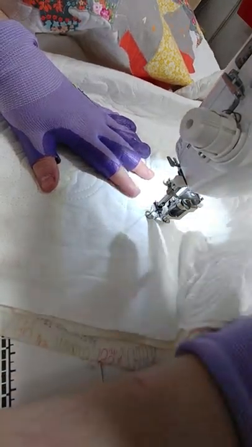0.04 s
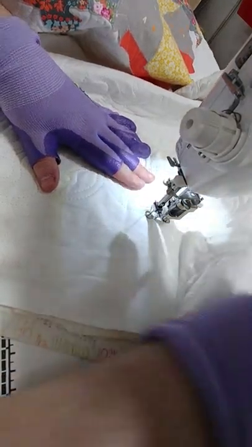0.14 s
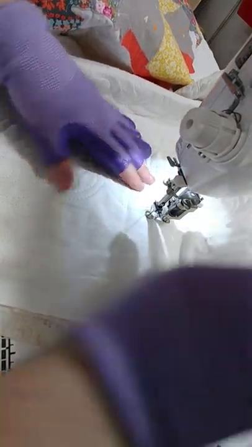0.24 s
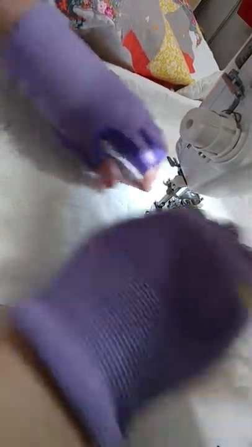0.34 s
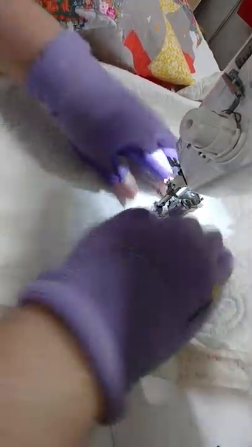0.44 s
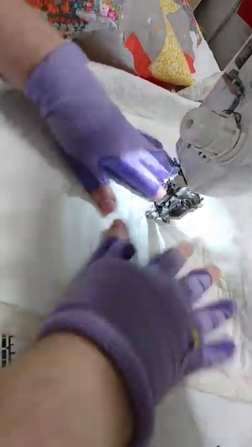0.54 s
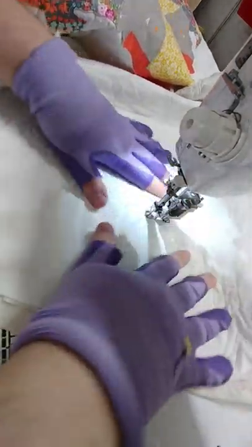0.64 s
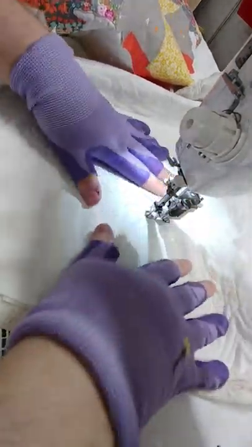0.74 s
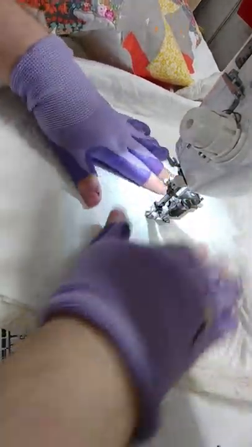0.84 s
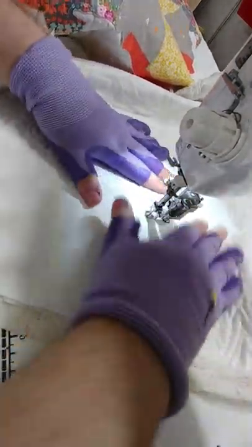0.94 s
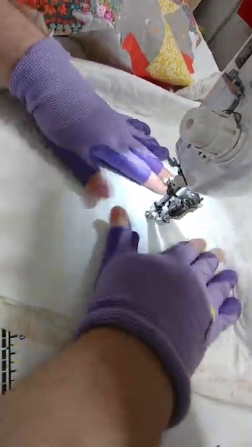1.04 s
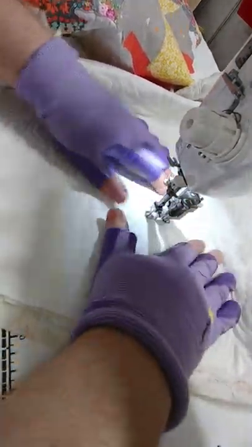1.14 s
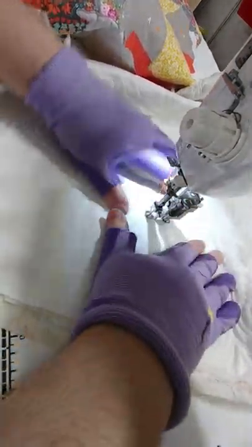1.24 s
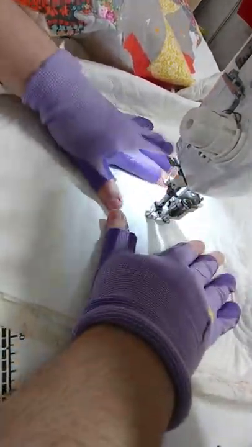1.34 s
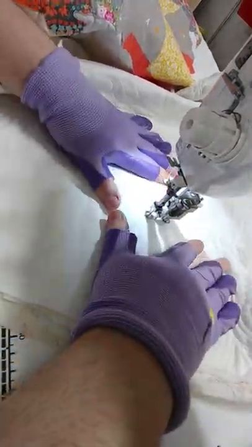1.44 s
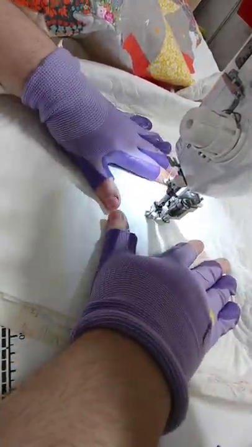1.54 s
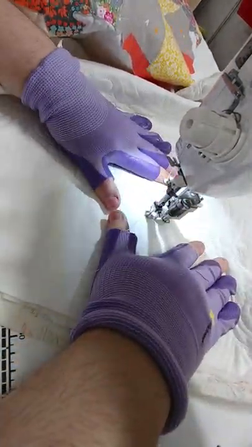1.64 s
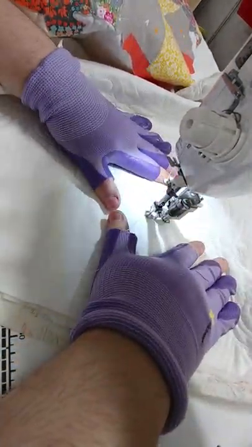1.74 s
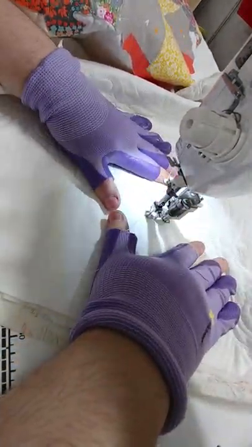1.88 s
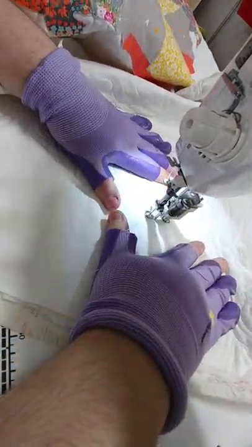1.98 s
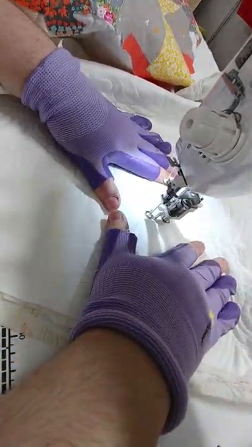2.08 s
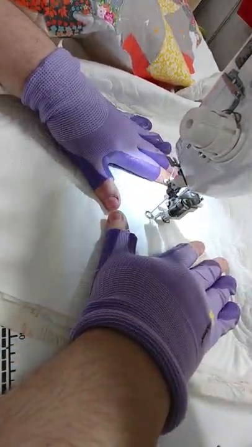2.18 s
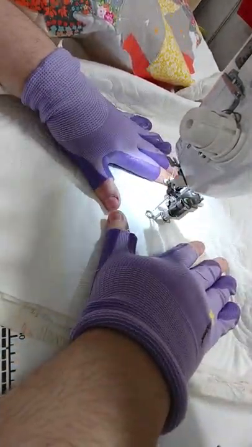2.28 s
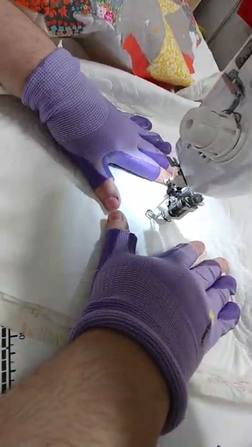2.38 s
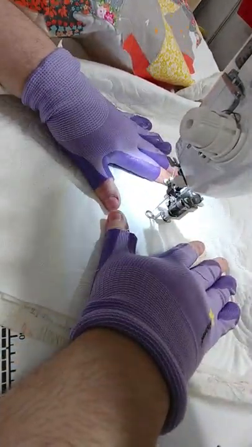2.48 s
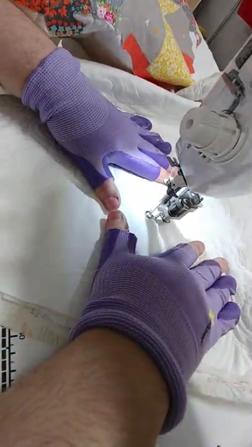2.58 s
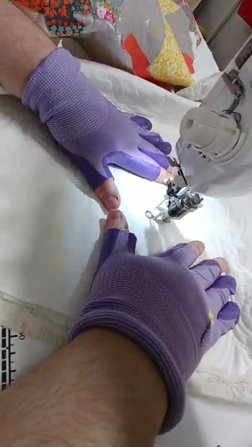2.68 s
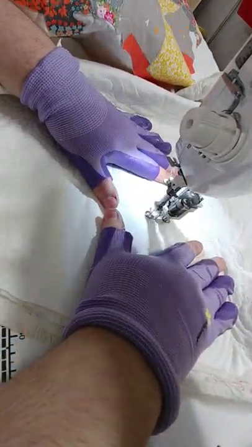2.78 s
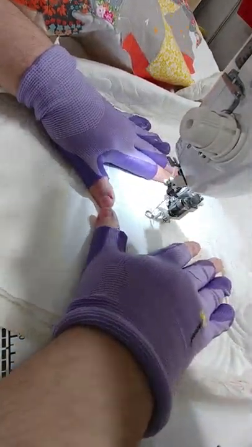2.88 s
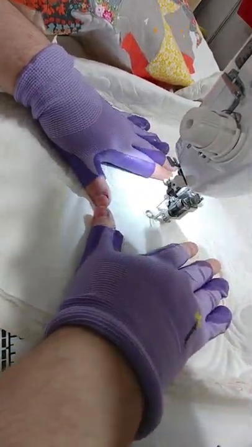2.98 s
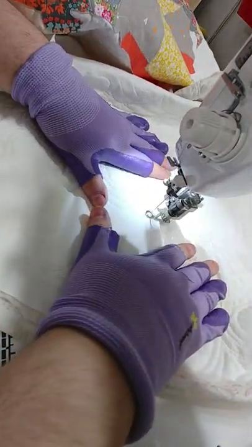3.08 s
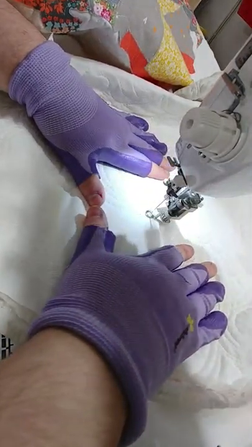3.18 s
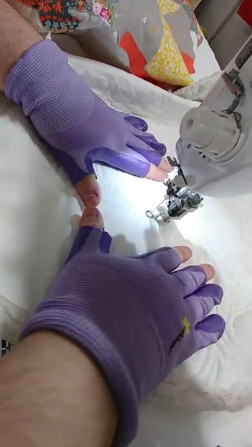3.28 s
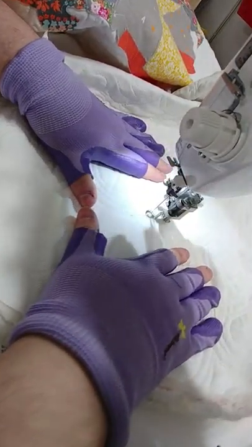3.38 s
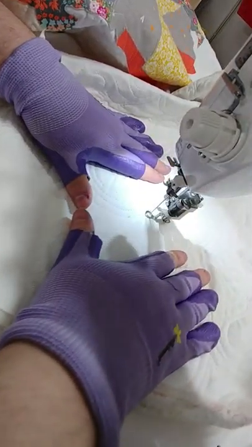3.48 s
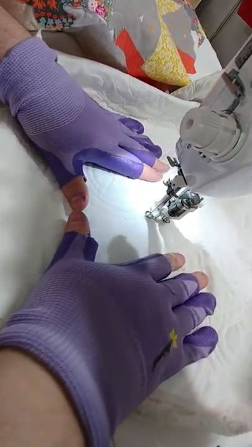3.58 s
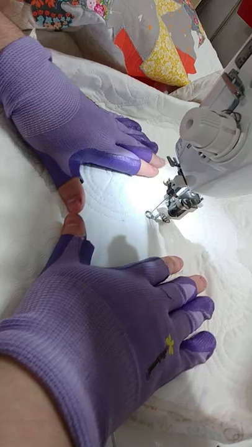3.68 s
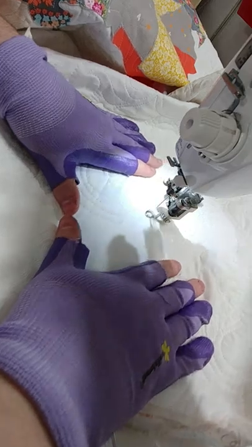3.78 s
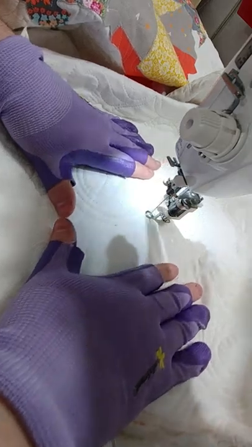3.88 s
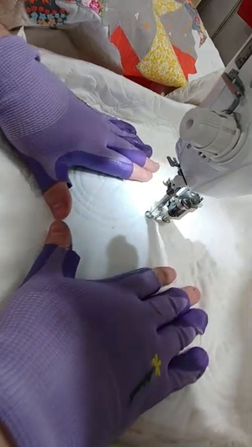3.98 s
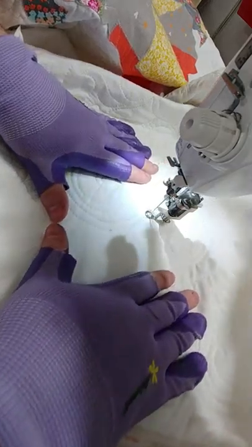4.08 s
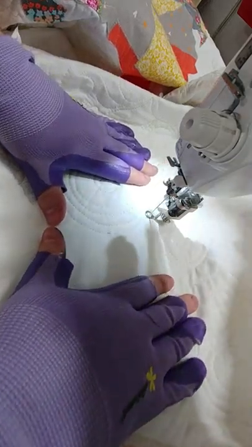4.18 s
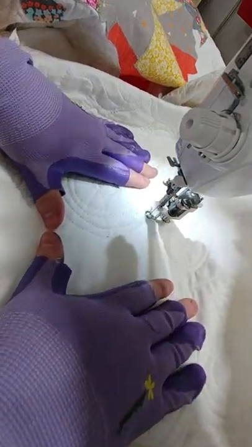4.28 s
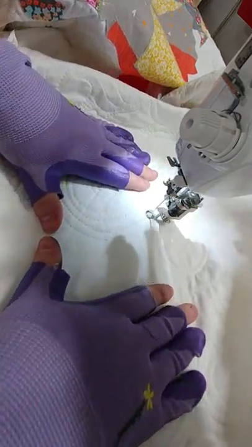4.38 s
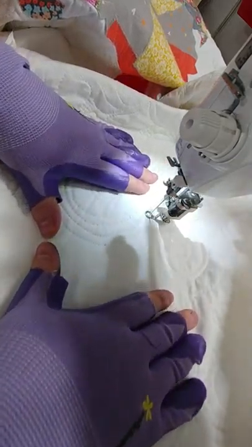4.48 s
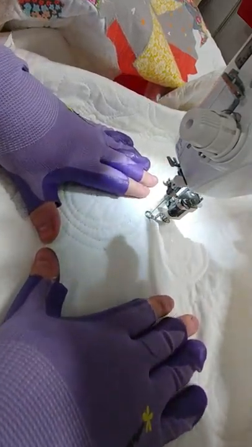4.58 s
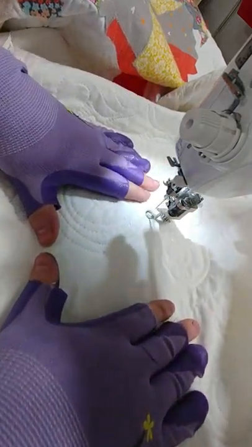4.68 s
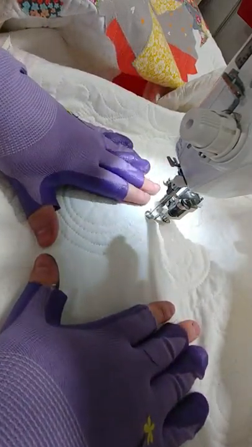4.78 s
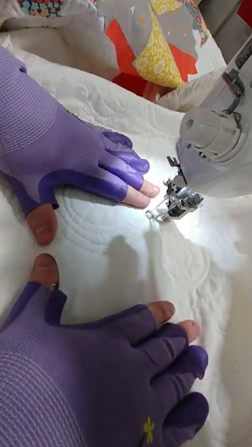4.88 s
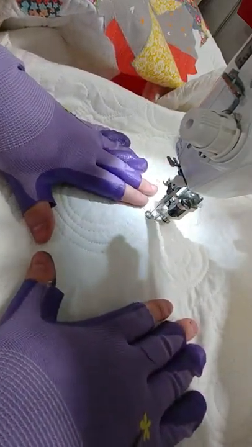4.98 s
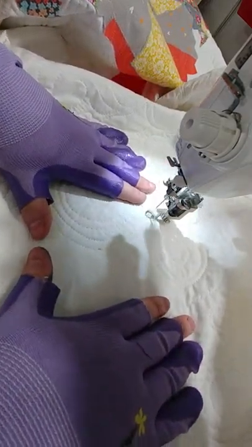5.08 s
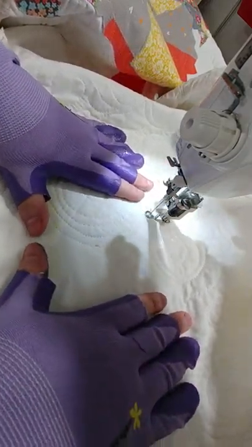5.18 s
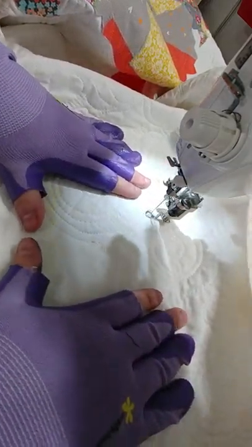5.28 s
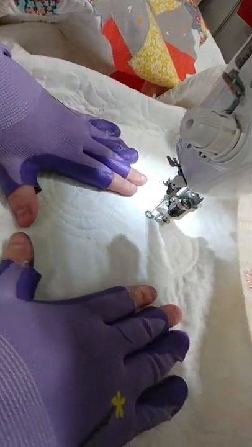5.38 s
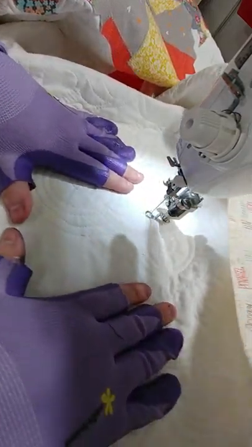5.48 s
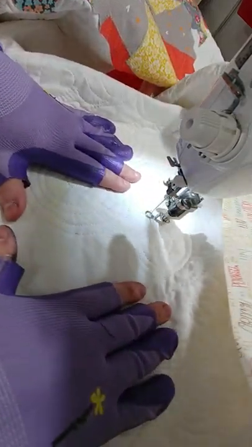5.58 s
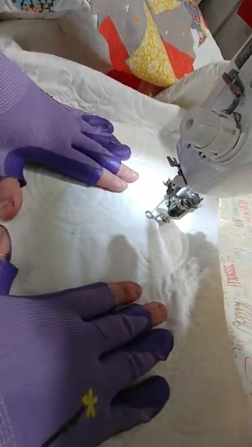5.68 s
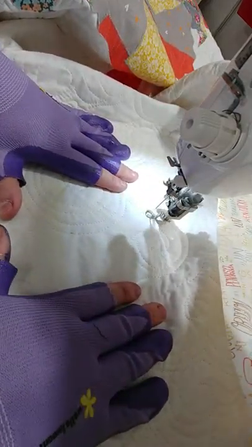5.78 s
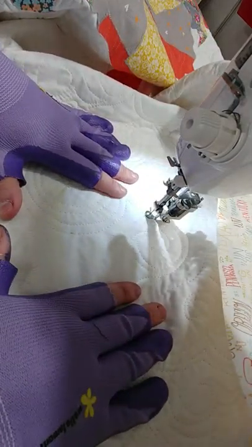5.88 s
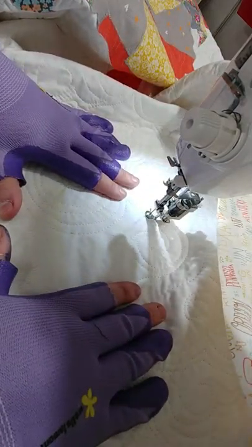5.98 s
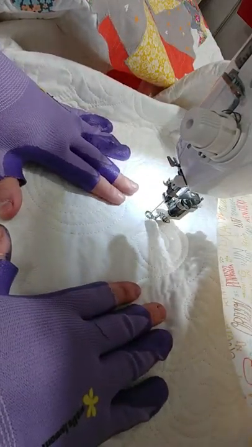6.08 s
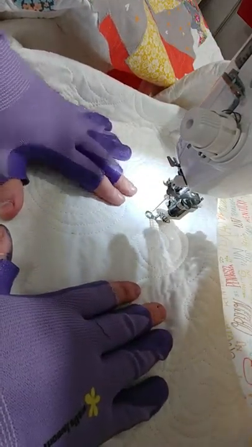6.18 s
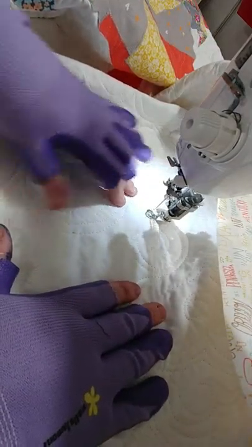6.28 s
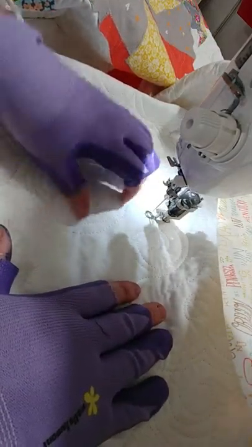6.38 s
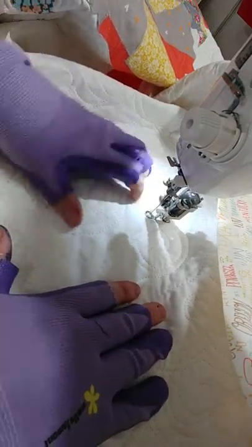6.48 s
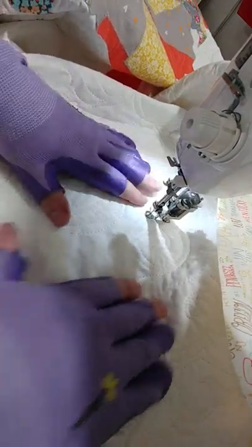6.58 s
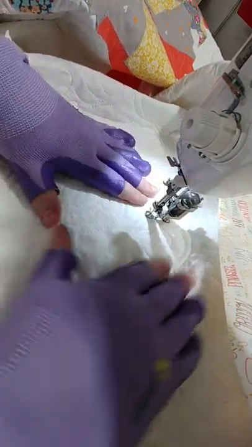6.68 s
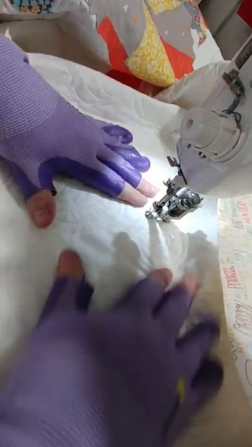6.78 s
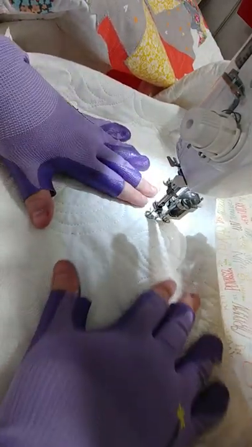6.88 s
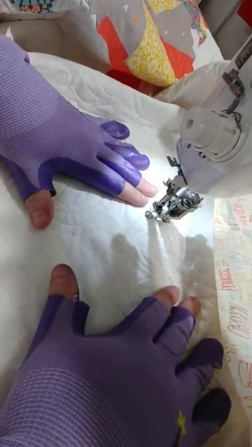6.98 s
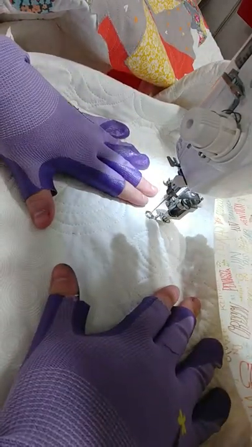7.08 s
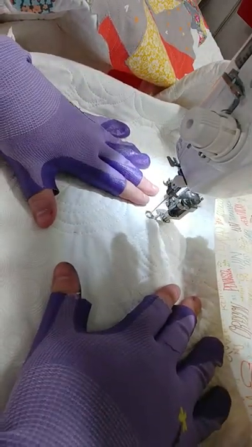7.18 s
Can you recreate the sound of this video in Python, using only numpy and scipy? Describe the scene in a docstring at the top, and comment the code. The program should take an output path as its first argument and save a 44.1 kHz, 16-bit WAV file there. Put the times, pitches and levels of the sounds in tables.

```python
"""At a sewing table, close by: a household machine's pedal makes the motor buzz, then the shaft speeds up.
Every stitch clicks in the needle mechanism and thumps the body and table: bursts of noise and ringing modes.
Hum and whine are stacked tones; buzz and gear whir are coloured noise that follows the pedal and the shaft.
Gloved hands push a quilt: table rumble and grainy cloth rustle, over a faint hiss and a short, bright room answer."""
import sys
import numpy as np
from scipy import signal
from scipy.fft import rfft, irfft, next_fast_len
from scipy.io import wavfile
from scipy.ndimage import map_coordinates

SR = 44100
rng = np.random.default_rng(int(sys.argv[2]) if len(sys.argv) > 2 else 0)


def bounce(signal):
    """Save signal as a 16-bit WAV file at the path given by the first command-line argument."""
    frames = np.transpose(np.atleast_2d(signal))
    limited = np.clip(frames, -1, 1)
    pcm = np.round(limited * 32767).astype(np.int16)
    wavfile.write(sys.argv[1], SR, pcm)


N = 319284

# stitches: (main click [s], its level [dB], lead of the first click [s], first click [dB], rebound [dB],
# casing knock [dB], thump [dB])
STITCHES = [(2.597, -58, 0.013, -75, -77, -71, -8.5), (2.798, -32.5, 0.0339, -20.0, -38, -26, -6),
            (2.964, -29, 0.0344, -25.5, -43.0, -20.5, -6.5),
            (3.0751, -19.5, 0.014, -20.0, -34.5, -22, -8.5), (3.1759, -14, 0.01, -18.5, -31.5, -16.0, -9.5),
            (3.2761, -16.5, 0.01, -15, -38.5, -17, -8.5),
            (3.3713, -16.5, 0.0083, -17.0, -34.5, -16.0, -9.5),
            (3.4654, -14.0, 0.011, -17.0, -31.5, -14.5, -9.0),
            (3.554, -12, 0.0078, -15, -30.5, -12.0, -6.5), (3.6374, -10.5, 0.011, -11, -24.5, -9.5, -8.5),
            (3.716, -12.5, 0.01, -15.5, -28.0, -6.5, -9.5), (3.7936, -9.5, 0.012, -18.5, -29.5, -10, -8),
            (3.87, -11.0, 0.0087, -18.5, -24, -8.5, -9), (3.9498, -10.0, 0.011, -14.5, -29.0, -11.5, -4.5),
            (4.0273, -9.5, 0.0097, -13, -24.5, -11.5, -7), (4.1053, -11, 0.0091, -14.5, -30, -10, -5.0),
            (4.1837, -8, 0.01, -14.5, -29.0, -9.0, -7.5), (4.2627, -11, 0.011, -13.5, -27.5, -9.5, -10.0),
            (4.337, -8.5, 0.0098, -15.5, -19.5, -13.5, -7.5), (4.4077, -8.0, 0.0089, -17, -17, -10.5, -8.5),
            (4.4822, -9.0, 0.01, -13.5, -22, -13.5, -7), (4.553, -10.5, 0.0093, -13, -17, -12, -6),
            (4.6252, -9, 0.009, -16.0, -22, -9.5, -11.5), (4.6977, -9.5, 0.0078, -16, -25, -14.5, -7.0),
            (4.7716, -8, 0.013, -15.0, -23, -10.5, -5.5), (4.8412, -7, 0.011, -14.5, -19, -12.5, -3.5),
            (4.9079, -11, 0.011, -12.5, -15, -11, -12.5), (4.9768, -7.5, 0.0129, -10.5, -19.5, -8.0, -10),
            (5.0438, -10.0, 0.0116, -10.5, -18.5, -7.5, -7), (5.1117, -8.5, 0.011, -12, -20.5, -5.5, -4.5),
            (5.1807, -8.5, 0.013, -11.5, -15, -6.5, -6.0), (5.2472, -8, 0.012, -13, -20.5, -7, -5.5),
            (5.3147, -6, 0.0115, -12.5, -20, -8.5, -11), (5.3816, -7.5, 0.0095, -14.5, -19.5, -7.0, -10.5),
            (5.452, -7.5, 0.0117, -13, -19.5, -5, -5.5), (5.5188, -9, 0.01, -11.0, -19.5, -8.5, -2),
            (5.5871, -9.5, 0.01, -11.0, -18, -8.0, -0.5), (5.6556, -8.5, 0.0124, -10.5, -18.5, -6.5, -6.5),
            (5.724, -7.5, 0.012, -12, -21.5, -8.0, -10), (5.7916, -8.0, 0.012, -11.5, -22, -8, -6.5),
            (5.8595, -9.0, 0.009, -16.5, -29.5, -9.5, -19.5),
            (7.2001, -21.5, 0.016, -37.5, -38, -21.5, -16.0)]
# modes of table and casing: (frequency [Hz], level [dB], t60 [s], polarity)
BODY_MODES = [(88, 0, .1, 1), (104, -4, .1, 1), (160, -.5, .1, 1), (206, -3, .12, -1), (265, -5.5, .12, 1),
              (325, -9, .07, -1), (480, -13, .04, 1), (680, -5, .045, -1), (780, -8, .04, 1),
              (1000, -12, .035, -1), (1290, -7, .035, 1), (1390, -5, .035, -1)]
# modes of needle bar and foot: (frequency [Hz], level [dB], t60 [s], signed gain)
STEEL_MODES = [(1670, -14, .03, -1.3), (2404, -11, 0.034, 0.86), (3300, -11, 0.021, -0.65),
               (5040, -3, 0.025, 0.8), (5686, 8.5, 0.015, -0.37), (6680, 1, 0.011, 0.88),
               (7875, 0, 0.025, -1.5), (8580, 0.5, 0.011, 0.55), (13300, -22, .008, -0.85)]
# shaft: (time [s], speed [stitches/s])
SHAFT_SPEED = [(2.54, 0.44), (2.615, 3.8), (2.63, 4.95), (2.73, 5.8), (2.74, 8.2), (2.8, 7.2), (2.815, 6.6),
               (2.84, 7.8), (2.87, 5.9), (2.9, 6.1), (2.91, 7.6), (3.06, 11.2), (3.3, 11.1), (3.68, 13.46),
               (4.25, 12.7), (4.4, 14.15), (4.72, 13.85), (4.85, 14.74), (5.8, 14.8), (5.88, 10.5),
               (5.935, 7.5), (5.95, 2.7), (5.98, 0.73), (6.03, 0.66), (6.08, 0.43), (7.11, .5), (7.12, 2.7),
               (7.16, 4.5), (7.17, 7), (7.2, 7.6), (7.24, 6.9)]
# current flows: (on [s], off [s], jerk at switch-on [dB])
PEDAL_PRESSES = [(1.959, 6.632, 18.5), (7.052, 7.3, 7.5)]
# the table shakes along at full speed: (start [s], end [s], level [dB])
TABLE_SHAKE = (4.78, 5.85, -20)
# powered, shaft at rest: {layer: level [dB]}
STALL_LEVELS = {"hum": -39.5, "buzz": -43.5, "whir": -58, "table": -49.5}
FULL_SPEED = 14.72  # stitches per s
SCATTER_DB, DETUNE = 1.6, .011  # spread of mode level and pitch (share) from blow to blow


def amp(db):
    """Decibels to amplitude."""
    return 10 ** (np.asarray(db) / 20)


def unit(x):
    """Scales to rms 1."""
    return x / np.sqrt(np.mean(x ** 2) + 1e-20)


def along(points, hz):
    """Reads (frequency [Hz], value) points on a log frequency axis."""
    f, v = np.transpose(points)
    return np.interp(np.log(hz + 1), np.log(f + 1), v)


def wobble(rate):
    """A smooth random curve, rate knots a second."""
    return map_coordinates(rng.standard_normal(int(N * rate / SR) + 4), [np.arange(N) * rate / SR])


def filtered(x, response):
    """Applies a complex response of frequency."""
    size = next_fast_len(N + SR // 2)
    return irfft(rfft(x, size) * response(np.fft.rfftfreq(size, 1 / SR)), size)[..., :N]


def noise(spectrum, channels=1):
    """Coloured noise of rms 1."""
    return unit(filtered(rng.standard_normal((channels, N)), lambda hz: amp(along(spectrum, hz))))


def spread(pair, alike):
    """A wide source: two noises that share only a part."""
    return unit(pair + alike * pair[::-1])


def add(track, s, sound):
    """Lays a sound into a track at a time."""
    track[round(s * SR):][:len(sound)] += sound


def gate(on, off, rise, fall):
    """0 to 1 from on, back to 0 after off."""
    t = np.arange(N) / SR
    return np.clip(np.minimum((t - on) / rise, 1 - (t - off) / fall), 0, 1)


def ring(modes, soft_hz, scatter_db, detune, rise_s=0):
    """One blow on a set of modes; a soft contact hardly reaches those above soft_hz."""
    t = np.arange(int(1.2 * SR * max(mode[2] for mode in modes))) / SR
    contact = 1 - np.exp(-t * soft_hz * 3)
    swell = np.sin(np.pi / 2 * np.minimum(t / (rise_s + 1e-9), 1)) ** 2
    total = 0
    for hz, db, t60, sign in modes:
        decay = amp(db + rng.normal(0, scatter_db) - 60 * t / t60)
        tone = np.sin(2 * np.pi * hz * rng.normal(1, detune) * t)
        total = total + sign * decay / (1 + (hz / soft_hz) ** 2) * tone
    return contact * swell * total


def thump(turn):
    """The body and table are pushed slowly: a faster turn pushes harder, a slow one swings the lowest mode."""
    rise_s = .1 * turn
    hard_hz = 200 / (turn * FULL_SPEED) ** 1.1
    lowest_hz = BODY_MODES[0][0]
    push = -(1 + (lowest_hz / hard_hz) ** 2) * ring(BODY_MODES, hard_hz, SCATTER_DB / 2, DETUNE / 5, rise_s)
    thud = ring(BODY_MODES[:1], 300, SCATTER_DB / 2, DETUNE / 5, 2 * rise_s)
    slowness = max(0, 1 - 1 / (turn * FULL_SPEED))
    add(push, 0, -2.6 * slowness * thud)
    return push


def needle():
    """Each turn: three steel clicks with casing and table knocks, then a soft thump amid light ticks."""
    # hook and feed tick lightly: (share of a turn after the click, level against it [dB])
    chatter = [(.38, -21.5), (.66, -20), (.74, -22)]
    # noise of the clicks: (frequency [Hz], relative level [dB])
    crack = [(880, -0.5), (1500, 0.5), (1870, -11.5), (2380, -18), (4570, -5), (5640, -2), (7100, -0.5),
             (8170, 1.5), (10700, -17), (13600, -6), (15400, -6), (16000, -36), (16500, -37.5)]
    knock_base_db, knock_follows = -6, 0.52  # the body knock follows the main click by this share
    shake_takes_knock_db, shake_takes_thump_db = 6, 13.5  # both are weaker while the table swings
    thump_turn, thump_lag_s = .385, .005  # share of a turn after the first click, and a fixed lag
    last_turn_s = 0.2  # stands in for the turn where the shaft coasts to rest
    ringing, rattle = np.zeros((2, N + SR))
    t = np.arange(SR // 10) / SR

    def puff(t60):
        return (1 - np.exp(-t / 0.00065)) * (amp(-60 * t / t60) + amp(-32.5 - 60 * t / 0.31))

    def steel(s, db, modes, soft_hz, scatter=1, detune=1):
        add(ringing, s, amp(db) * ring(modes, soft_hz, scatter * SCATTER_DB, detune * DETUNE))

    def body(s, db, modes, soft_hz):
        add(ringing, s, amp(db) * ring(modes, soft_hz, SCATTER_DB / 2, DETUNE / 5))

    # light ticks ring a share of the steel's time
    damped = [(hz, db, .35 * t60, sign) for hz, db, t60, sign in STEEL_MODES[:4]]
    gaps = np.diff([hit - lead for hit, _, lead, *_ in STITCHES])
    turns = np.minimum(np.append(gaps, 1 / SHAFT_SPEED[-1][1]), np.append(gaps[0], gaps))
    stopping = np.append(gaps > .5, False)
    for stitch, turn, stops in zip(STITCHES, turns, stopping):
        hit, main_db, lead, first_db, rebound_db, casing_db, thump_db = stitch
        first, rebound = hit - lead, hit + 0.0074
        shaking = TABLE_SHAKE[0] < hit < TABLE_SHAKE[1]

        # first click, main click, rebound
        steel(first, first_db - 1.5, STEEL_MODES[5:], 11000)
        add(rattle, first, amp(first_db) * puff(0.023))
        steel(hit - .0008, main_db, STEEL_MODES, 5300)
        add(rattle, hit - .0015, amp(main_db) * puff(0.03))
        steel(rebound, rebound_db, STEEL_MODES[2:], 8000, scatter=2, detune=2)
        add(rattle, rebound, amp(rebound_db + 1.5) * puff(0.015))

        if not stops:
            for share, db in chatter:
                tick = hit + (share + rng.normal(0, .02)) * turn
                steel(tick, main_db + db + 16.5 + rng.normal(0, 2.9), damped, 4000, detune=3)

        # knocks in casing and table
        knock_db = knock_base_db - shake_takes_knock_db * shaking + knock_follows * main_db
        knock_db += rng.normal(0, SCATTER_DB)
        body(hit - .004, main_db - 6.5, BODY_MODES[:2], 240)
        body(hit + 0.00088, casing_db, BODY_MODES[6:], 2300)
        body(hit + 0.004, knock_db - 2, BODY_MODES[1:], 350)
        body(rebound, casing_db - 5.5, BODY_MODES[6:], 1700)

        thump_at = first + thump_turn * (last_turn_s if stops else turn) + thump_lag_s
        add(ringing, thump_at, amp(thump_db - shake_takes_thump_db * shaking) * thump(turn))
    return ringing[:N] + rattle[:N] * spread(noise(crack, channels=2), alike=0.13)


def shake():
    """At full speed some multiples of the stitch rate fall on the table's modes and keep them ringing."""
    # (multiple of the stitch rate, level before the swing [dB])
    orders = [(5, -21), (6, 1), (7, -5), (11, -2.5), (12, -4.5), (14, -1), (17, -18.5), (18, -2.5)]
    start, end, level_db = TABLE_SHAKE
    turns = FULL_SPEED * (np.arange(N) / SR - 5.332)
    swing_db = 4.5 * np.cos(2 * np.pi * (turns - .08))  # swells once a turn, strongest after the thump
    tones = 0
    for k, db in orders:
        above_lowest = k * FULL_SPEED > BODY_MODES[2][0] / 1.3  # only these multiples swell
        level = amp(db + swing_db * above_lowest + 0.43 * wobble(8.1))
        tones = tones + level * np.cos(2 * np.pi * k * turns + 0.29 * wobble(4.3))
    return amp(level_db) * gate(start, end, 0.051, 0.01) * tones


def pedal():
    """1 while current flows, with short ramps."""
    return sum(gate(on, off, .012, .05) for on, off, _ in PEDAL_PRESSES)


def shaft_speed():
    """Shaft speed as a share of full speed."""
    return np.interp(np.arange(N) / SR, *np.transpose(SHAFT_SPEED)) / FULL_SPEED


def motor_level(layer):
    """The stalled level, jerked by inrush and strain, plus a level that grows as a power of speed."""
    # at full speed: {layer: level [dB]}
    run_levels = {"buzz": -26, "whir": -18.5}
    # {layer: amplitude as a power of speed}
    powers = {"buzz": 0.71, "whir": 2.24}
    # the stalled motor strains against the load: (time [s], swell [dB])
    strains = [(2.03, 2.5), (2.17, 6.5), (2.29, 5), (2.36, 7), (2.47, 8.5), (2.59, 2), (6.06, 3.5),
               (6.18, 8.5), (6.301, 8.5), (6.399, 11.5), (6.51, 7.5), (7.124, 12)]
    t = np.arange(N) / SR
    inrush_db = sum(db * np.exp(-np.abs(t - on) / 0.029) for on, _, db in PEDAL_PRESSES)
    strain_db = sum(db * np.exp(-((t - s) / 0.023) ** 2) for s, db in strains)
    stalled = amp(STALL_LEVELS[layer]) * amp(inrush_db + strain_db)
    running = amp(run_levels[layer]) * np.clip(shaft_speed() - .04, 0, 2) ** powers[layer]
    return pedal() * (stalled + running)


def windings():
    """The windings buzz at twice the mains rate: unsteady harmonics and throbbing noise."""
    # (multiple of the buzz, relative level [dB])
    harmonics = [(1, 1), (2, -10.5), (3, -6), (4, -0.5), (5, -11), (6, -12), (7, -6.5), (8, -7)]
    # noise of the stalled and running motor: (frequency [Hz], relative level [dB])
    fuzz_spectrum = [(35, -57.5), (60, 5), (115, 1.5), (151, -24), (230, -24), (330, -10), (477, -2),
                     (533, -14), (945, -2), (1080, -12), (1280, -24), (1600, -21), (2500, -33.5),
                     (3720, -42), (5000, -72), (6500, -102.5), (11000, -120)]
    buzz_hz = 119.66
    phase = 2 * np.pi * buzz_hz * np.arange(N) / SR
    tones = 0
    for k, db in harmonics:
        drift = .25 * np.sqrt(k) * wobble(13) + rng.uniform(0, 2 * np.pi)
        tones = tones + amp(db + 0.83 * wobble(22)) * np.sin(k * phase + drift)
    hum_level = pedal() * amp(STALL_LEVELS["hum"] + 2.5 * wobble(14))
    throb = 1 + .25 * np.sin(phase) + .25 * np.sin(2 * phase)
    fuzz = spread(noise(fuzz_spectrum, channels=2), alike=0.3) * throb * amp(0.57 * wobble(21))
    return hum_level * tones + motor_level("buzz") * fuzz


def gears():
    """Belt and gears whir and chatter: noise rings in the frame and brightens with speed."""
    # gears and belt: (frequency [Hz], relative level [dB])
    whir_spectrum = [(150, -23), (250, 4), (528, -12), (698, -5.5), (1050, -6.5), (1200, -13.5),
                     (1350, -14.5), (1500, -12.5), (1680, -10.5), (1900, -15), (2400, -16.5), (2800, -13.5),
                     (3330, -16), (3900, -15), (4650, -18), (5730, -21.5), (7060, -21.5), (7980, -22),
                     (10500, -45.5), (13700, -30.5), (16000, -52)]
    # the whir rings in the frame: (frequency [Hz], share)
    frame_modes = [(1290, 0.48), (1487, .6), (2400, .6), (3131, .5), (3350, 0.82), (3655, 0.31), (4356, .5),
                   (5992, 0.55)]
    width_hz, dull_hz = 26, 4000
    bright_speed = 0.46  # share of full speed where the treble above dull_hz is complete
    slack_db, slack_turn = 2, 0.62  # quieter this share of a turn after the click
    speed = shaft_speed()

    def frame(f):
        return 1 + sum(share * 1j * f * width_hz / (centre * centre - f * f + 1j * f * width_hz)
                       for centre, share in frame_modes)

    near, far = filtered(noise(whir_spectrum, channels=2), frame)
    side = filtered(far, lambda f: f ** 2 / (f ** 2 + 400 ** 2))  # the low whir is alike at both ports
    flicker = unit(amp(2.2 * wobble(300) + 0.51 * wobble(40)))
    whir = unit(near + [[.9], [-.9]] * side) * flicker
    treble = filtered(whir, lambda f: f ** 6 / (f ** 6 + dull_hz ** 6))
    whir = whir - (1 - np.clip(speed / bright_speed, 0, 1) ** 3) * treble
    shaft = np.interp(np.arange(N) / SR, np.transpose(STITCHES)[0], np.arange(len(STITCHES)))
    slack = amp(-slack_db * np.cos(2 * np.pi * (shaft - slack_turn)) * np.clip(speed, 0, 1))
    return motor_level("whir") * slack * whir


def whine():
    """Motor and belt teeth sing at multiples of the stitch rate; a casing mode answers them."""
    # (multiple of the stitch rate, level before the casing's answer [dB])
    teeth = [(78, -32), (72, -37), (60, -32)]
    # pitch of the first multiple: (time [s], frequency [Hz])
    pitch = [(2.9, 520), (3.02, 620), (3.15, 790), (3.4, 830), (3.55, 930), (3.65, 995), (4.24, 998),
             (4.3, 1050), (4.45, 1083), (4.72, 1083), (4.82, 1150), (5.8, 1147), (5.95, 600)]
    # the casing answers: (frequency [Hz], width [Hz], gain [dB])
    casing = (1000, 45, 12)
    mode_hz, width_hz, gain_db = casing
    rate = np.interp(np.arange(N) / SR, *np.transpose(pitch)) / teeth[0][0]
    rate = rate * (1 + .004 * wobble(30))  # unsteady pitch
    tones = 0
    for k, db in teeth:
        answer_db = gain_db / (1 + ((k * rate - mode_hz) / width_hz) ** 2)
        level = amp(db + 1.4 * wobble(13) + answer_db)
        tones = tones + level * np.sin(2 * np.pi * k * np.cumsum(rate) / SR)
    return np.clip(shaft_speed() - .3, 0, 1) * tones


def taps():
    """Pedal, foot and thread tick lightly on the machine; hands thud on the table."""
    # small taps: (time [s], level [dB], knock against it [dB], centre of the grit [Hz], grit t60 [s])
    ticks = [(0.259, -25, -12.5, 3800, 0.034), (1.9599, -40, -9, 1970, .016),
             (1.975, -39, -16, 2010, 0.018), (2.5154, -36, 6, 2010, 0.014), (2.5292, -33, 1, 4330, 0.013),
             (2.624, -43, -3, 2527, .03), (2.736, -38, -12, 5980, .09), (2.905, -39, -12, 5000, .07),
             (3.007, -24, 6, 6000, .012), (6.154, -51, -6, 6000, .03), (6.187, -49, -2, 1500, .015),
             (6.2645, -40, -11, 6320, .02), (6.3822, -31, -3, 9530, 0.0098),
             (6.393, -36.5, -0.5, 3010, 0.0088), (6.399, -37, -6.5, 4980, .01),
             (6.41, -43, -2.5, 1500, .01), (6.512, -50, -1.5, 2000, .01), (7.05, -46, -3, 2000, 0.0162),
             (7.115, -45.5, -1, 6500, .03), (7.166, -36.5, -8, 6000, .06), (7.236, -32, -5.5, 6000, .02)]
    # a hand lands on the table: (time [s], level [dB])
    hand_thuds = [(0.409, -30), (0.59, -26.5), (1.37, -25.5)]
    track, t = np.zeros(N + SR), np.arange(SR // 5) / SR
    for s, db, knock_db, hz, t60 in ticks:
        soft_noise = np.convolve(rng.standard_normal(len(t)), np.hanning(15) / 3, "same")
        grit = soft_noise * np.cos(2 * np.pi * hz * t)
        decay = amp(-60 * t / t60) + 0.17 * amp(-60 * t / 0.11)
        add(track, s, amp(db - 11) * ring(STEEL_MODES[1:4:2], 7000, SCATTER_DB, DETUNE))
        add(track, s, amp(db - 10) * decay * grit)
        add(track, s, amp(db + knock_db + 8.5) * ring(BODY_MODES[5:8], 700, SCATTER_DB, DETUNE))
    for s, db in hand_thuds:
        add(track, s, amp(db + 3.5) * ring(BODY_MODES[:5], 89, SCATTER_DB, DETUNE))
    return track[:N]


def quilt():
    """Hands push the quilt: the table rumbles and the cloth rustles in fine grains, over a steady hiss."""
    # hands push the quilt: (peak [s], length [s], table rumble [dB], rustle [dB])
    strokes = [(0.018, 0.6, -54, -61), (0.271, 0.057, -58, -47.5), (0.408, 0.053, -43, -85),
               (0.595, 0.12, -37.5, -43.5), (.74, 0.099, -63, -59.5), (1.06, 0.053, -49, -59),
               (1.11, 0.058, -67, -62), (1.36, 0.52, -55, -57), (1.844, 0.15, -53, -62.5),
               (2.532, 0.03, -43, -40.5), (5.96, .12, -57.5, -50.5), (6.155, .06, -39.5, -55.5),
               (6.267, 0.036, -31.5, -51), (6.398, 0.07, -40, -54), (6.524, 0.34, -47.5, -58),
               (6.928, 0.22, -66, -57)]
    # hands at rest: {layer: level [dB]}
    still_levels = {"rumble": -53, "hiss": -64.5}
    # table rumble: (frequency [Hz], relative level [dB])
    rumble_spectrum = [(15, -49), (25, -34), (91, 2), (135, -9), (308, -6.5), (440, -24), (608, -22.5),
                       (941, -31.5), (1200, -52.5), (1560, -57.5), (2640, -120)]
    # cloth: (frequency [Hz], relative level [dB])
    rustle_spectrum = [(410, -43), (700, -3), (1770, -11.5), (1940, -12.5), (2490, -14.5), (3600, -12),
                       (6500, -14.5), (7200, -15.5), (7790, -11), (8900, -22), (10700, -41), (12800, -24),
                       (16000, -29.5)]
    # room and microphone: (frequency [Hz], relative level [dB])
    hiss_spectrum = [(290, -32), (500, 0), (605, -20.5), (1270, -18.5), (1430, -26.5), (1730, -21),
                     (1890, -25.5), (2600, -20.5), (9010, -31.5), (14800, -37.5), (16400, -45)]
    rise_share, drop_db = 0.83, 21.5  # rise over fall time; loss one length after the peak
    t = np.arange(N) / SR
    rumble = amp(still_levels["rumble"] + 0.5 * wobble(5.4))
    hiss = amp(still_levels["hiss"] + 1.2 * wobble(4.8))
    table = amp(STALL_LEVELS["table"] + 2.2 * wobble(17)) * pedal()  # shaken by the motor
    rustle = 0
    for s, length, rumble_db, rustle_db in strokes:
        swell = amp(-drop_db * np.maximum((t - s) / length, (s - t) / (rise_share * length)))
        rumble = rumble + amp(rumble_db) * swell
        rustle = rustle + amp(rustle_db) * swell
    low = noise(rumble_spectrum, channels=2)
    low = unit(low + 2.4 * low[::-1]) * amp([[1.5], [-1.5]])  # mostly shared, louder at the left
    deep = filtered(low, lambda hz: 1 / (1 + (hz / 160) ** 4))
    grains = unit(amp(2.5 * wobble(400) + 0.5 * wobble(24)))
    cloth = rustle * grains * noise(rustle_spectrum, channels=2)
    return rumble * low + table * deep + hiss * noise(hiss_spectrum, channels=2) + cloth


def room(x):
    """A short, bright answer, different at each port: noise tails whose frequencies die at their own speeds."""
    # decay of the room: (frequency [Hz], t60 [s])
    decay = [(100, 0.07), (1000, 0.075), (10000, 0.0055)]
    wet, step = np.zeros((2, N + SR)), SR // 8
    for start in range(0, N, step):  # a freshly drawn tail for each stretch
        hz, t, z = signal.stft(rng.standard_normal((2, SR // 5)), SR, nperseg=256)
        fading = z * amp(-60 * t / along(decay, hz)[:, None])
        tail = signal.istft(fading, SR, nperseg=256)[1]
        piece = signal.fftconvolve(x[None, start:start + step], tail / np.linalg.norm(tail[0]), axes=1)
        wet[:, start:start + piece.shape[1]] += piece
    # the room answers mainly the treble; lower blows stay dry
    return filtered(wet[:, :N], lambda hz: hz ** 4 / (hz ** 4 + 1900 ** 4))


def ports(x, lag_s):
    """The machine reaches the left port a little later, with its own balance at each frequency."""
    # balance: (frequency [Hz], left minus right [dB])
    lean = [(60, 5.0), (110, 4.0), (200, 0.0), (380, 1.0), (700, 1.0), (1290, -0.5), (2380, 0.5),
            (4400, -0.5), (6500, 1), (8120, 7), (11000, 3), (15000, 1.5)]
    # table and casing modes shift the lag at the left port: (frequency [Hz], phase [rad])
    skew = [(110, 0.11), (200, 0.98), (250, 0.22), (380, -.3), (520, 0), (600, -1.1), (690, -2),
            (775, -3.2), (860, -4.6), (950, -6.3), (1290, -6.3), (1350, -8.6), (1410, -8.6), (1470, -6.3)]
    side = np.array([[1], [-1]])

    def response(hz):
        half_lag = np.pi * hz * lag_s + along(skew, hz) / 2
        return amp(side * along(lean, hz) / 2) * np.exp(-1j * half_lag * side)

    return filtered(x, response)


def scene():
    """The machine at both ports, the room's answer to its blows, and the quilt."""
    blows = needle() + taps()
    motor = windings() + gears() + whine()
    return ports(blows + shake() + motor, lag_s=0.0003435) + room(blows.mean(axis=0)) + quilt()


def record(dry):
    """The microphone thins the deep bass, saturates towards full scale and keeps nothing above its band limit."""
    top_hz = 16500

    def bass_cut(hz):
        resonant = (hz ** 2 / (74 ** 2 - hz ** 2 + 1j * hz * 66)) ** 2
        return resonant * hz ** 2 / (hz - 60j) ** 2 + .02  # a trace of bass leaks through

    thin = filtered(dry, bass_cut)
    clipped = thin / (1 + np.abs(thin) ** 8) ** (1 / 8)
    return filtered(clipped, lambda hz: hz < top_hz)


dry = scene()
out = record(dry)
bounce(out)
```